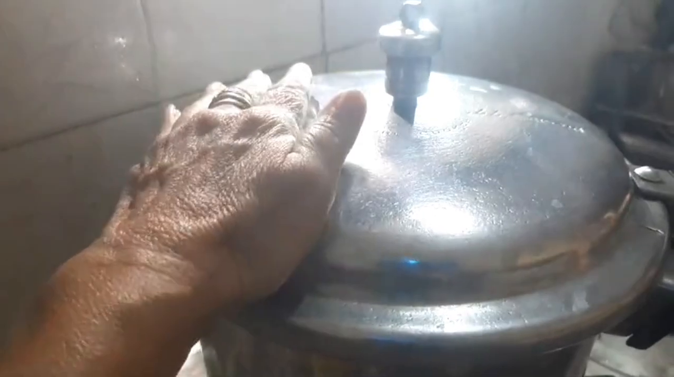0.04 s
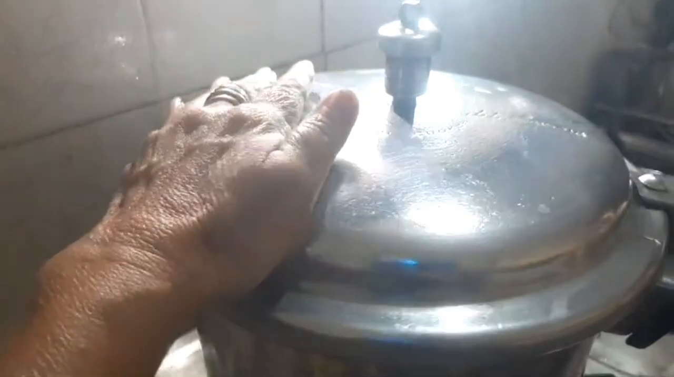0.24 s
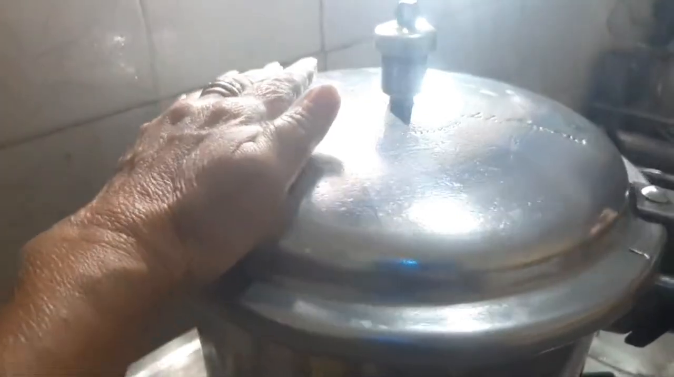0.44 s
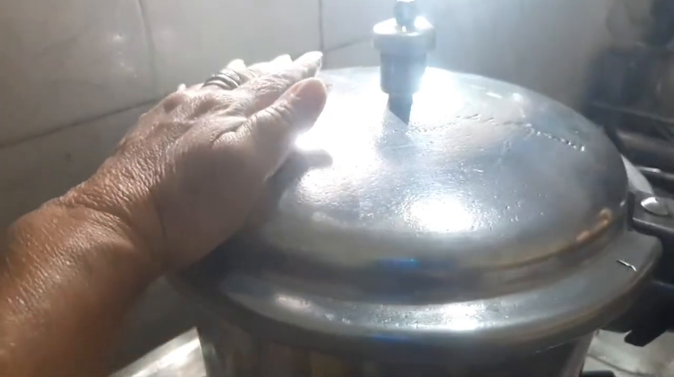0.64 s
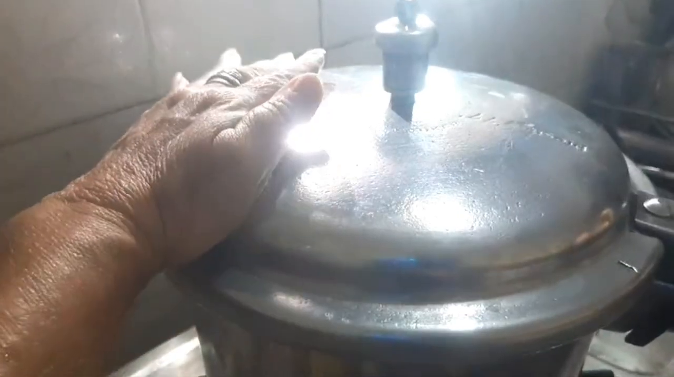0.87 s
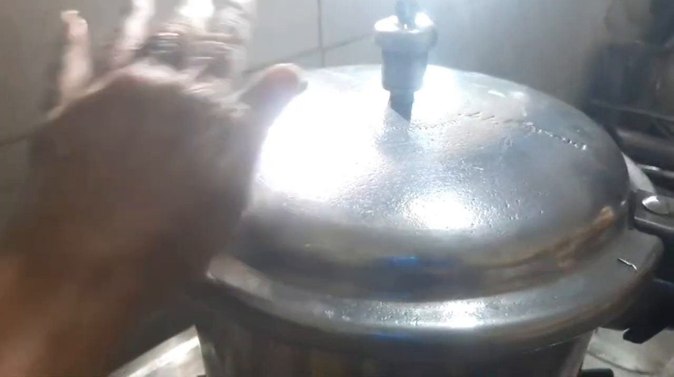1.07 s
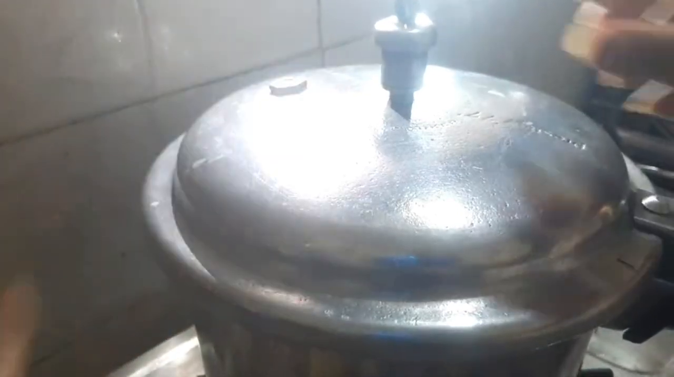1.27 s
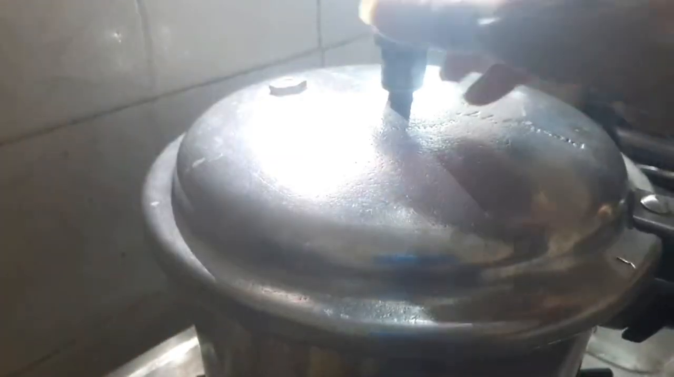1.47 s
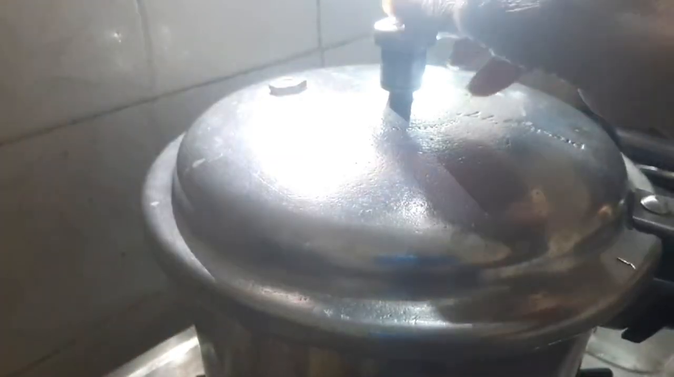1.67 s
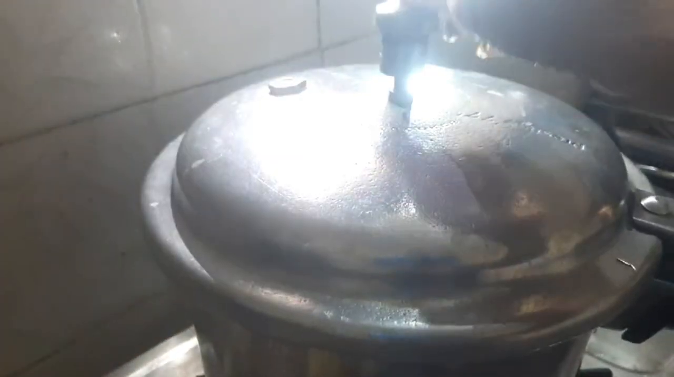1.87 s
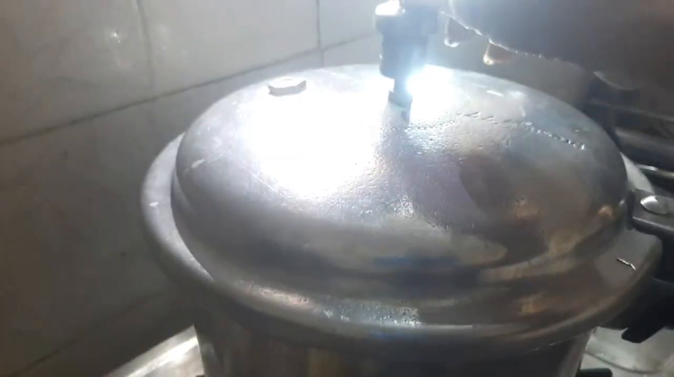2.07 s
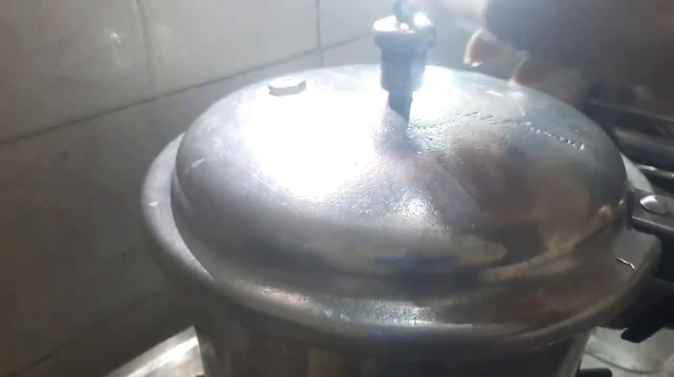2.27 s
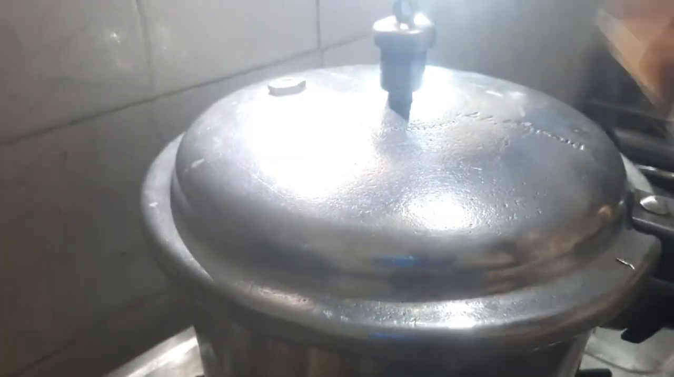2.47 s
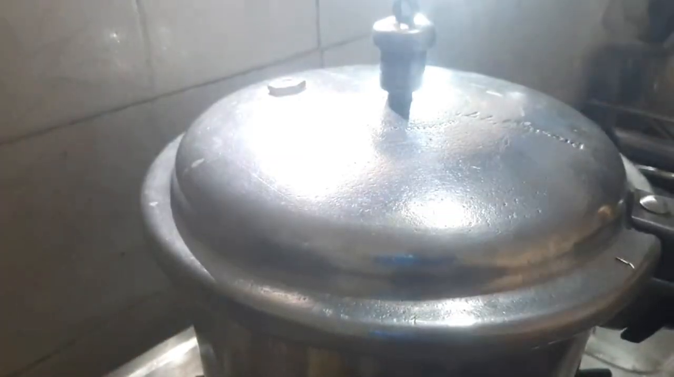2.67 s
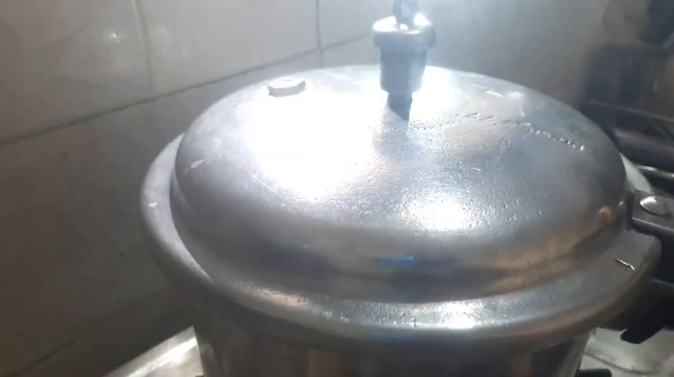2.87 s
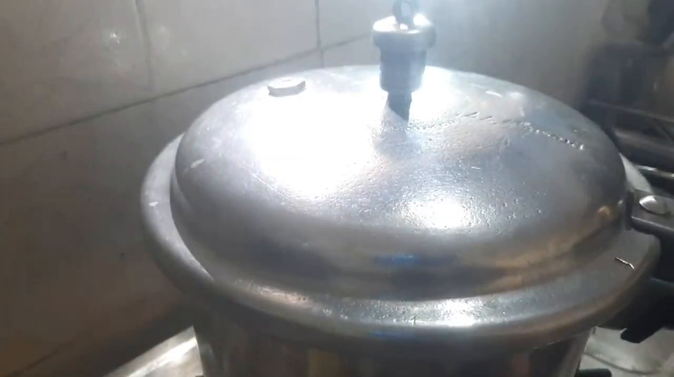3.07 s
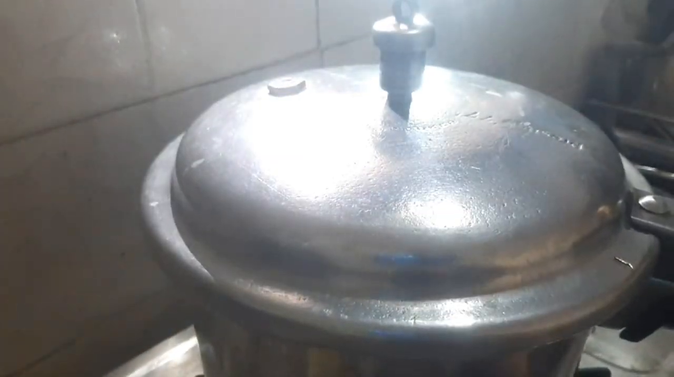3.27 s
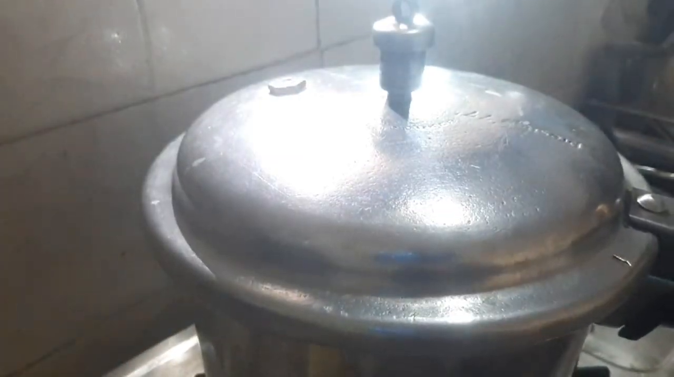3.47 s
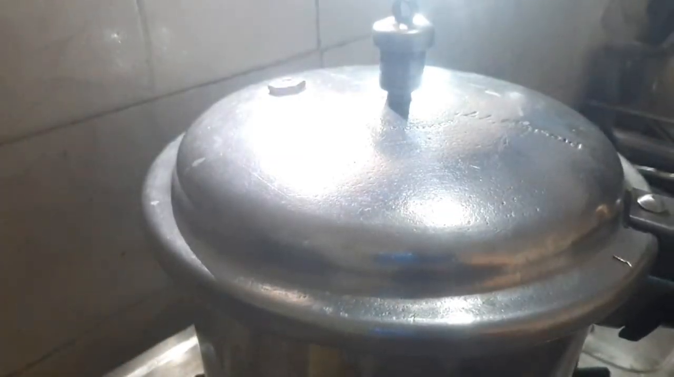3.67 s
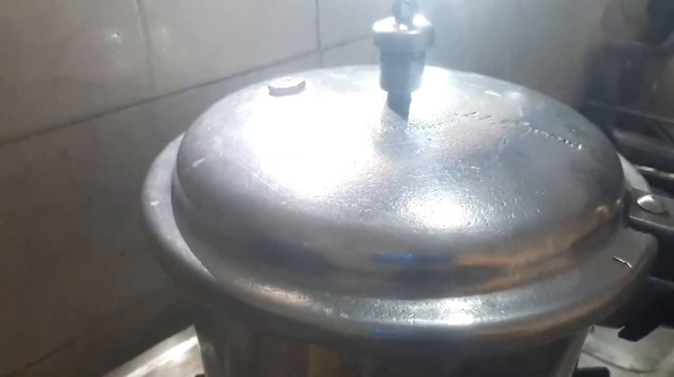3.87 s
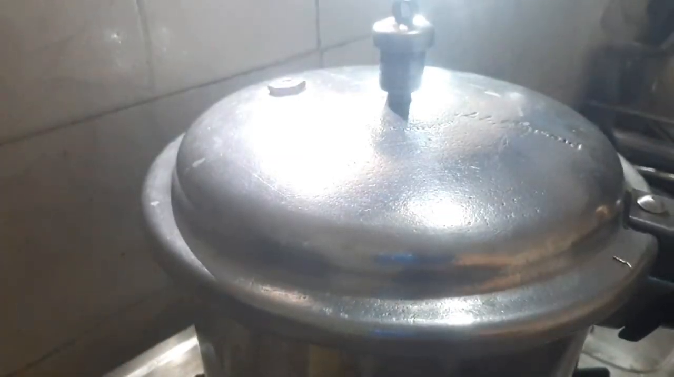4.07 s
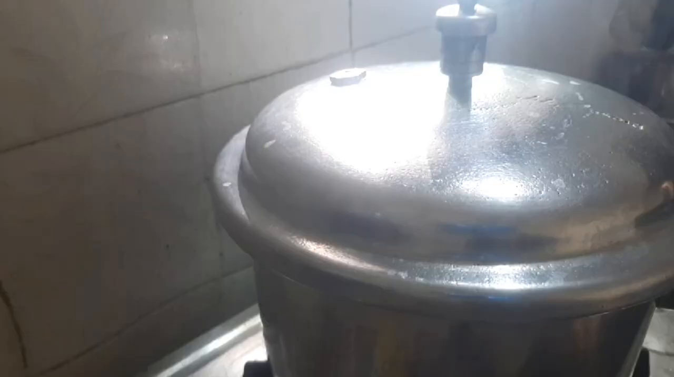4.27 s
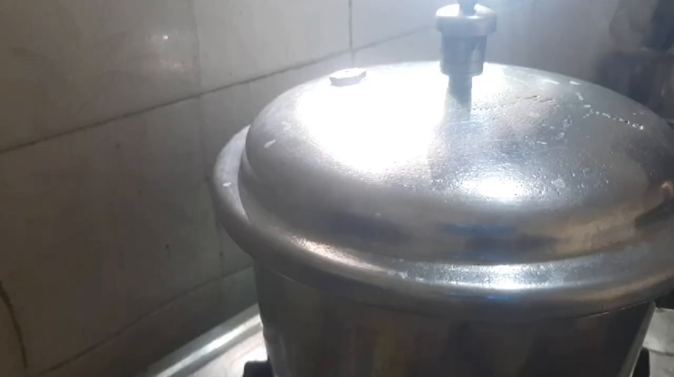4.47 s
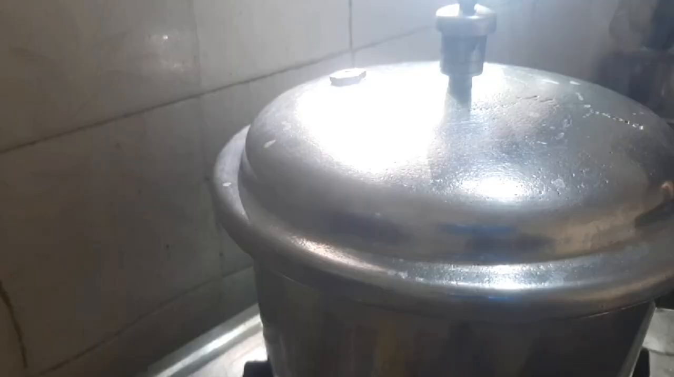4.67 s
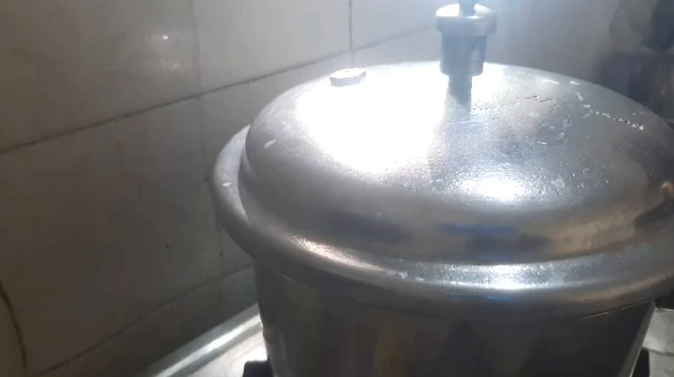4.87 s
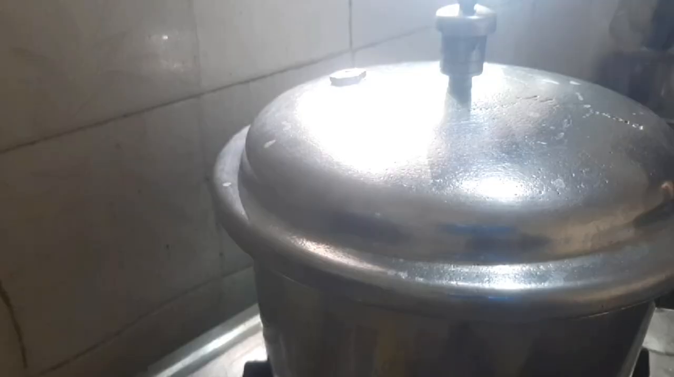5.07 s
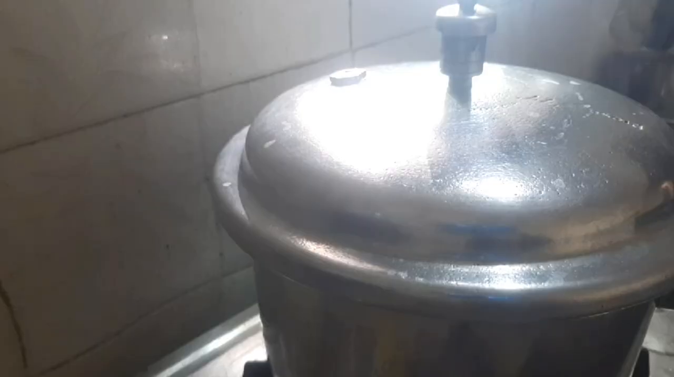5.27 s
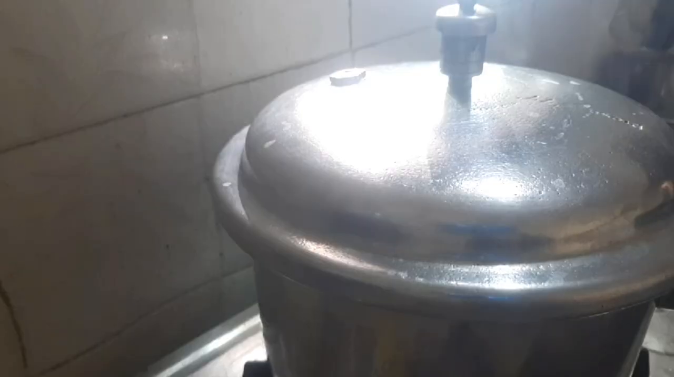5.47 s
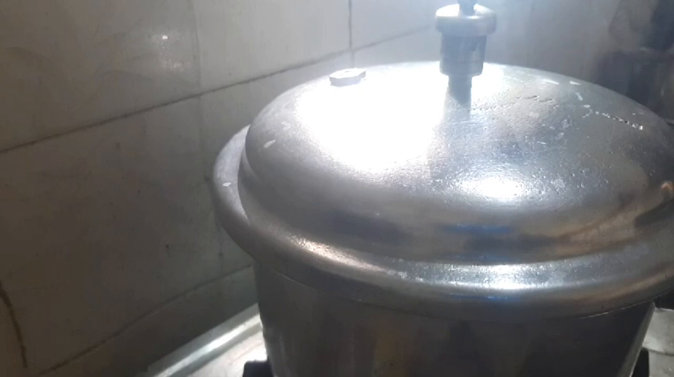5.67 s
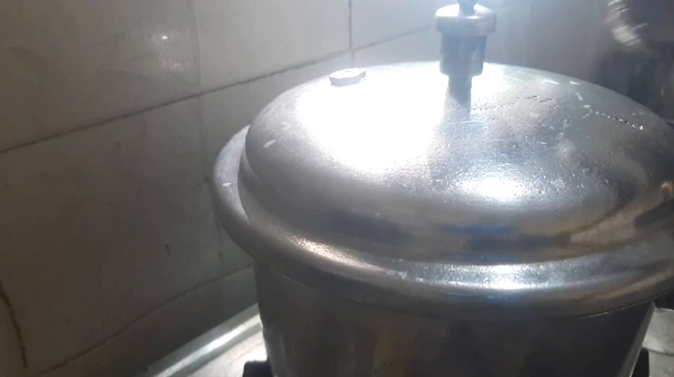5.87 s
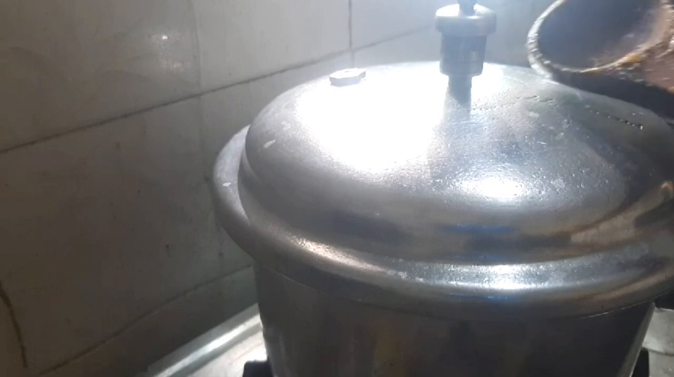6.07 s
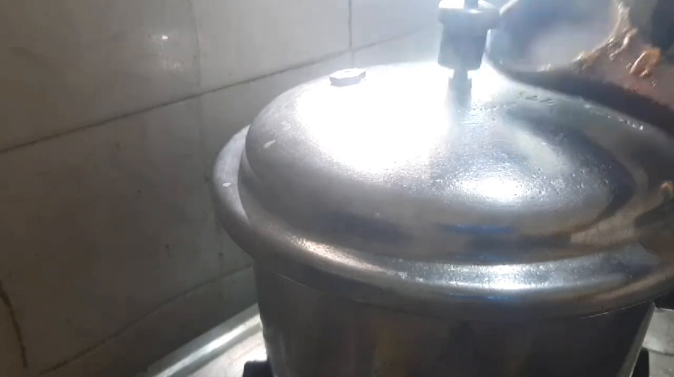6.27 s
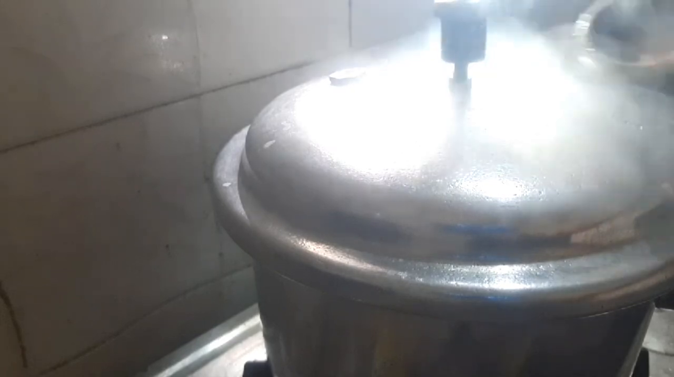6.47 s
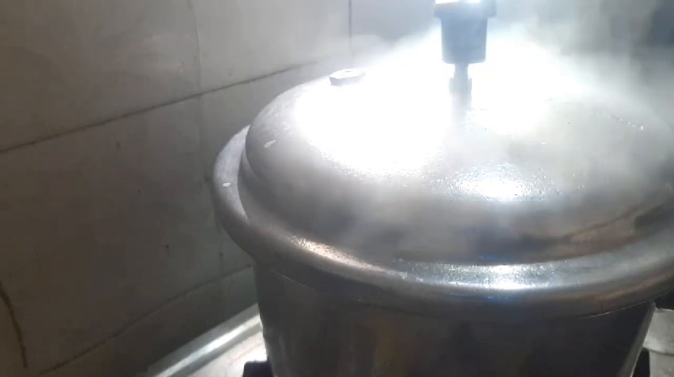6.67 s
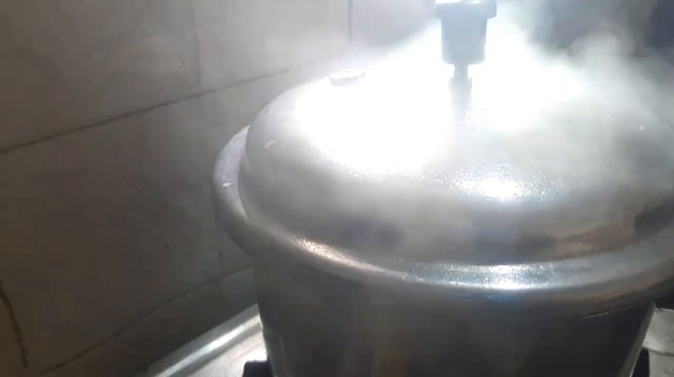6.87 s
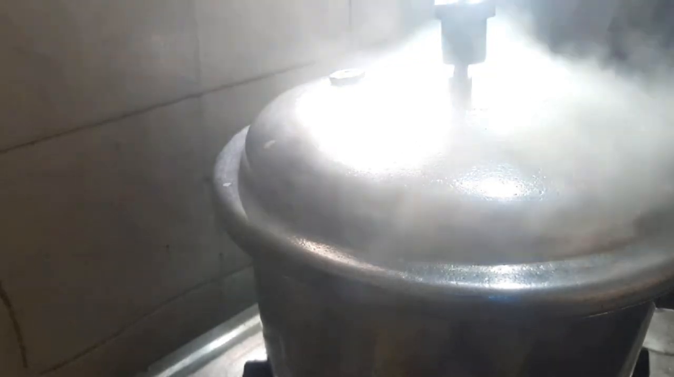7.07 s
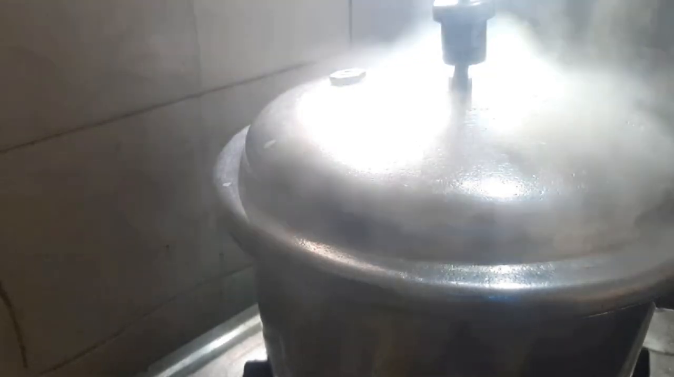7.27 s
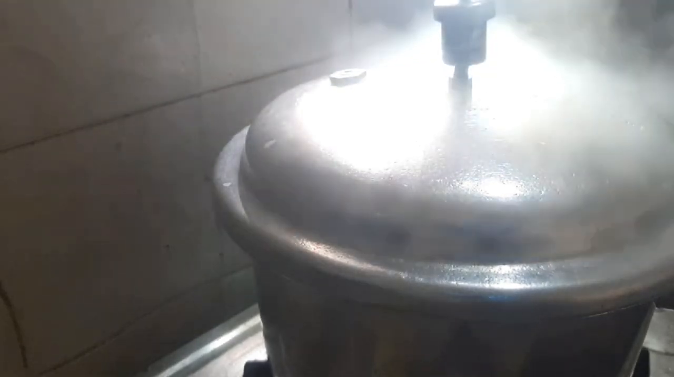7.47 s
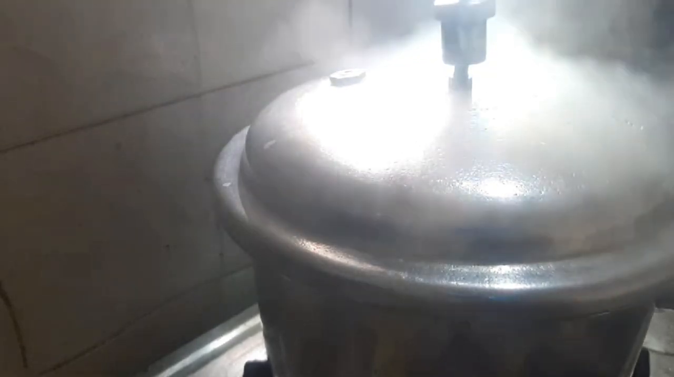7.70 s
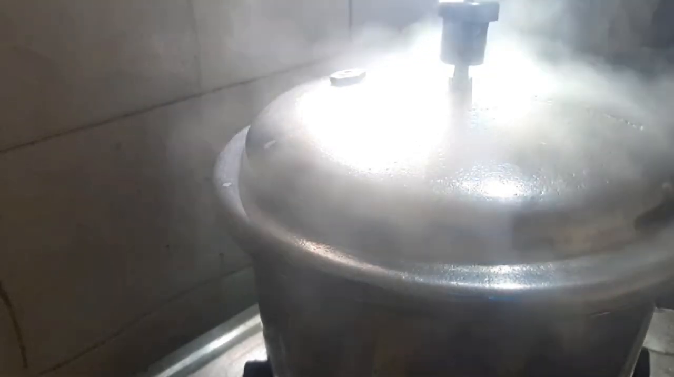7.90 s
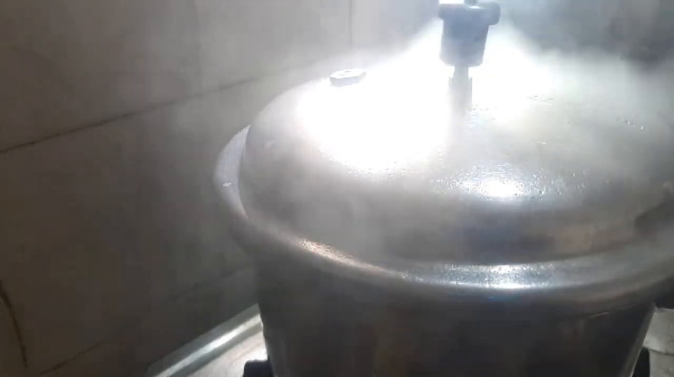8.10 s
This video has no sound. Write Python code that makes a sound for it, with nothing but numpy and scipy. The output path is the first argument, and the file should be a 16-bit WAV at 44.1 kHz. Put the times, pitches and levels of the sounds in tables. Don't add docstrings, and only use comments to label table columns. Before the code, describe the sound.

Light finger taps and metal clinks on a pressure cooker lid, then thin steam hiss, a ladle knock, and a loud full steam blast.

```python
import sys
import numpy as np
from scipy import signal
from scipy.fft import rfft, irfft, next_fast_len
from scipy.io import wavfile
from scipy.ndimage import uniform_filter1d

SR = 44100
rng = np.random.default_rng(int(sys.argv[2]) if len(sys.argv) > 2 else 0)


def makeup_ratio(level_db):
    decades = np.asarray(level_db, float) / 20
    return 10 ** decades


def transcribe(u):
    v = np.clip(np.atleast_2d(u).T, -1, 1)
    q = np.round(v * 32767).astype(np.int16)
    wavfile.write(sys.argv[1], SR, q)


N = 358974
FAST = next_fast_len(N, True)
FREQS = np.fft.rfftfreq(FAST, 1 / SR) + 1
CUT_S, LIFT_S = 4.1225, 6.222

# pitch_hz, level_db per Hz
WEIGHT_CRACK = [(100, -41), (200, -1), (900, -24), (1800, 3.5), (2800, -3.5), (3700, -10), (4500, 0),
                (6500, -19), (8300, -54), (10500, -17.5), (11800, -32), (12500, -77)]
# (pitch_hz, left_lag_rad)
BACK_STEREO = [
    [(60, 10), (200, 9.4), (380, 12), (700, 12), (4400, 8.2), (8120, 1.4), (15000, 7.8)],
    [(60, 0.81), (130, 1), (290, 0.97), (640, 0.38), (1410, 0.11), (3100, 0.03), (6820, 0.05), (15000, 0.6)],
    [(100, 0.12), (3000, 0.55)],
]


def rms_one(x):
    return x / np.sqrt(np.mean(x ** 2) + 1e-20)


def wave(spectrum):
    return irfft(spectrum, FAST)[..., :N]


def in_time(rows):
    s, *columns = np.transpose(rows)
    return np.array([np.interp(np.arange(N) / SR, s, c) for c in columns])


def at_hz(points, hz):
    points = np.array(points)
    return np.interp(np.log(hz), np.log(points[:, 0] + 1e-9), points[:, 1])


def swells(rows):
    t = np.arange(N) / SR
    power = 0
    for s, db, rise, fall in rows:
        away = np.maximum((s - t) / abs(rise), (t - s) / abs(fall))
        power = power + makeup_ratio(2 * (db - 10 * away))
    return np.sqrt(power)


def drift(rate):
    r = np.exp(-80 * np.pi * rate / SR)
    slow = signal.lfilter([1], [1, -2 * r, r * r], rng.standard_normal(N // 40 + 2002))[2000:]
    return np.interp(np.arange(N) / 40, np.arange(len(slow)), rms_one(slow))


def causal(points, share=1):
    curve_db = share * at_hz(points, np.linspace(1, SR / 2, 2049))
    cepstrum = irfft(np.log(makeup_ratio(curve_db)))
    cepstrum[1:2048] *= 2
    cepstrum[2049:] = 0
    return irfft(np.exp(rfft(cepstrum)))


def stereo_noise(spectrum, stereo, ripple_db=0.0):
    balance, likeness, lag = stereo
    mid, side = rfft(rng.standard_normal((2, N)), FAST)
    alike = np.sqrt(np.clip(at_hz(likeness, FREQS), 0, 1))
    pan = makeup_ratio(at_hz(balance, FREQS) / 2)
    pair = np.sqrt(1 + alike) * mid + np.sqrt(1 - alike) * side * [[1], [-1]]
    left_turn = pan * np.exp(-1j * at_hz(lag, FREQS))
    pair *= makeup_ratio(at_hz(spectrum, FREQS)) * np.array([left_turn, 1 / pan])
    ripple = rng.standard_normal((2, 300))
    comb = np.array([np.interp(FREQS, np.arange(300) * 75, r) for r in ripple])
    pair *= makeup_ratio(ripple_db * np.clip(FREQS / 4000, 0, 1) * comb)
    return pair / np.std(wave(pair.mean(axis=0)))


def resonance(hz, width_hz):
    noise = rfft(rng.standard_normal(N), FAST)
    return rms_one(wave(noise / (1 + 2j * (FREQS - hz) / width_hz) ** 2))


def steam(flow, law, spectrum, stereo, patchy_db, gust_db):
    # pitch_hz, width_hz, depth_db
    dips_and_lifts = [(2784, 130, -8.5), (3310, 120, 0), (4570, 110, 0), (5750, 300, -2.5), (8400, 740, -3.5),
                      (2025, 63, 2), (5350, 130, 3), (1500, 99, 2.5)]
    # pitch_hz, width_hz, level_db re the flow
    whistles = [(1830, 97, -54.5), (2026, 51, -26)]
    noise = stereo_noise(spectrum, stereo, ripple_db=1.8)
    dip_lift_db = sum(db * np.exp(-(2 * (FREQS - hz) / width) ** 2) for hz, width, db in dips_and_lifts)
    noise = noise * makeup_ratio(dip_lift_db)
    level_db, shares, opening_db, settle_s = law
    surge = np.exp(-np.maximum(np.arange(N) / SR - flow[0][0], 0) / settle_s)
    change = np.outer(shares, in_time(flow)[0]) + np.outer(opening_db, surge)
    centres = np.geomspace(300, 14000, 10)
    gust = gust_db * drift(25)
    out = 0
    for k, hz in enumerate(centres):
        band = np.interp(np.log(FREQS), np.log(centres), np.arange(10) == k)
        follow = [np.interp(np.log(hz), np.log([1600, 5000, 12000]), part) for part in np.eye(3)]
        out = out + wave(noise * band) * makeup_ratio(follow @ change + gust + patchy_db * drift(16))
    whistle = sum(makeup_ratio(db) * resonance(hz, width) for hz, width, db in whistles)
    return makeup_ratio(level_db) * (out + whistle * makeup_ratio(change[0]) * makeup_ratio([[2.5], [-2.5]]))


def steam_leak():
    # start_s, level_db
    leak_flow = [
        (4.13, 1),
        (4.5, 1),
        (6.22, -1.5),
    ]
    # level_db, flow shares of roar/hiss/sizzle, opening_db of roar/hiss/sizzle, settle_s
    leak_law = (-33.5, (.3, 0.51, 1.0), (0.78, -2.4, 0.34), 0.092)
    # pitch_hz, level_db per Hz
    leak_colour = [(120, -23), (300, -21.5), (900, -14.5), (1950, -3.5), (2750, -9), (4000, -6.5),
                   (6500, -7.5), (7300, -8), (8350, -21.5), (9500, -11), (11400, 0.5), (13200, -5.5),
                   (15750, -8)]
    # (pitch_hz, left_lag_rad)
    leak_stereo = [
        [(100, 14), (700, 9), (2000, 5), (2700, 3.5), (3600, 9), (4800, 0), (7300, -5.5), (12500, -0.5), (14000, 9), (15700, 3)],
        [(100, 0.55), (1000, 0.14), (1800, 0.33), (2700, .1), (5500, 0.089), (6500, 0.18), (8500, 0.058), (12000, 0.28), (14500, 0.018)],
        [(1500, 0.35), (2500, 1.2), (4500, 1.3), (5600, 0.67), (8500, -1), (10000, -1.03), (12500, 0.27), (14000, 0)],
    ]
    opened = np.clip((np.arange(N) / SR - CUT_S) / 0.0018, 0, 1)
    return opened * steam(leak_flow, leak_law, leak_colour, leak_stereo, patchy_db=0.6, gust_db=0.48)


def steam_jet():
    # start_s, level_db
    jet_flow = [(6.222, -20), (6.241, -5), (6.273, 4), (6.353, 4), (6.385, -0.5), (6.461, 7.5),
                (6.531, 2.5), (6.56, 6.5), (6.63, 3.5), (6.7, 4), (6.74, 0), (6.975, -1), (7.04, 1.5),
                (7.2, 0), (7.33, 2), (7.46, 0), (7.8, 2), (8.1, -1.5)]
    # level_db, flow shares of roar/hiss/sizzle, opening_db of roar/hiss/sizzle, settle_s
    jet_law = (-23.5, (0.34, 0.083, 1), (9.3, 1.6, 0.55), 0.35)
    # pitch_hz, level_db per Hz
    jet_colour = [(35, -40.5), (90, -27.5), (330, -25), (900, -19), (1500, -11), (2050, -8.5), (2720, -10),
                  (3800, -7), (6300, -5), (8350, -18), (9700, -7.5), (11500, 1), (13500, -5.5), (15750, -9)]
    # (pitch_hz, left_lag_rad)
    jet_stereo = [
        [(100, -5), (350, -2.5), (1500, 5.5), (2600, 0), (3300, 8.5), (4500, 3), (5400, -1.5), (9000, -3.5), (12500, 1.5), (14000, 4.5), (15700, 9)],
        [(100, 0.13), (1000, .12), (1800, 0.19), (2700, 0.057), (5500, 0.039), (6400, 0.1), (7600, 0.062), (10500, 0.23), (13000, .05), (15000, .01)],
        [(1500, 0), (2500, 0.8), (4500, 1.66), (5500, 6), (6000, 0.74), (9000, -0.1), (11000, 0.58), (14000, 1)],
    ]
    return steam(jet_flow, jet_law, jet_colour, jet_stereo, patchy_db=0.92, gust_db=0.4)


def strike(blows, modes, crack, ring_db, crack_db, damping, top_hz):
    s, peak_db, tilt, contact_ms = np.transpose(blows)
    start = int(s[0] * SR)
    luck = rng.normal(0, 0.77, (len(s), len(modes)))
    at = (s * SR).astype(int) - start
    out = 1e-9 * rng.standard_normal(at[-1] + SR)
    age = np.arange(2048) / SR / np.clip(contact_ms[:, None] / 1000, 2e-4, .02)
    bursts = rng.standard_normal((len(s), 2048)) * np.exp(-age)
    tint = uniform_filter1d(np.abs(rfft(bursts)) ** 2, size=15, axis=1)
    pitch = np.arange(1025) * SR / 2048 + 1
    evened = []
    for burst, power in zip(bursts, tint):
        flatten = causal(np.c_[pitch, -6 * np.log10(power / power.mean())])
        evened.append(signal.fftconvolve(burst, flatten)[:2048])
    bursts = np.array(evened) * (1 - .85 * np.exp(-age / .25))
    drive = np.abs(rfft(bursts))
    for k, (hz, level_db, t60) in enumerate(modes):
        push = np.zeros(len(out)) + 1e-18
        tilt_db = tilt * np.log2(max(hz, 300) / 1000)
        strength = makeup_ratio(peak_db + level_db + ring_db + tilt_db + luck[:, k])
        strength /= drive[:, round(hz / SR * 2048)] + .3 * drive.mean(axis=1)
        for i, g, burst in zip(at, strength, bursts):
            push[i:i + 2048] += g * burst
        r = makeup_ratio(-60 / (min(t60, 1) * damping * SR))
        w = 2 * np.pi * hz / SR
        out += signal.lfilter([0, np.sin(w)], [1, -2 * r * np.cos(w), r * r], push)
    colour = causal(crack)
    for i, level_db, slope, burst in zip(at, peak_db, tilt, bursts):
        burst = signal.fftconvolve(burst, colour)
        tilted = causal([(250, -2 * slope), (16000, 4 * slope)])
        burst = signal.fftconvolve(burst, tilted)[:4096]
        out[i:i + 4096] += makeup_ratio(level_db + crack_db) * burst / np.abs(burst).max()
    out = signal.sosfilt(signal.cheby1(8, 1, top_hz, fs=SR, output="sos"), out)
    out = signal.sosfilt(signal.butter(2, 75, "high", fs=SR, output="sos"), out)
    return np.pad(out, (start, N - start - len(out)))


def ringing(blows, modes, rise_s, t60):
    out = 0
    for s, db in blows:
        age = np.maximum(np.arange(N) / SR - s, 0)
        shape = makeup_ratio(db - 60 * age / t60) * (1 - np.exp(-age / rise_s))
        out = out + shape * sum(makeup_ratio(level_db) * np.sin(2 * np.pi * hz * age) for hz, level_db in modes)
    return out


def lid_taps():
    # start_s, peak_db, tilt_db per octave, contact_ms
    taps = [
        (0.025, -43, 8.5, 3.1),
        (0.292, -32, -0.5, 4.4),
        (0.366, -29.5, -1, 4.2),
        (0.493, -31.5, 1.5, 3.4),
        (0.554, -46, 2, 3.9),
        (0.704, -43, -7.5, 6.9),
        (0.739, -54, -7, 5),
    ]
    # pitch_hz, level_db, t60_s
    lid = [(383.6, -2.5, 0.98), (595, 8, 0.09), (730, -6, 0.292), (860, -11, 0.26), (936, 4, 0.175),
           (1470, -9, 0.215), (2040, -19, 0.39), (3420, -19, 0.17), (4350, -24, .15), (5260, -14.5, 0.065)]
    # pitch_hz, level_db per Hz
    lid_crack = [(100, -10), (250, -12), (700, 3), (1200, 2.5), (2100, -3), (3000, -18.5), (5300, -17),
                 (7000, -54)]
    return strike(taps, lid, lid_crack, ring_db=-12, crack_db=-1.5, damping=0.2, top_hz=6000)


def stem_knocks():
    # start_s, peak_db, tilt_db per octave, contact_ms
    touches = [
        (1.498, -31.5, -0.7, 3.5),
        (1.619, -40, 1.3, 1.5),
        (1.7365, -29, 0.22, 2.2),
        (1.751, -39.5, 0.7, 0.72),
        (1.774, -39.5, 0.37, 2),
    ]
    # start_s, peak_db, tilt_db per octave, contact_ms
    drop = [
        (1.908, -27.5, 0.7, 3.9),
        (1.9133, -13, 0.99, 1.14),
        (1.922, -20, 0.9, 1.6),
        (1.927, -33, 0.7, 1.2),
        (1.944, -38, 0.64, 1.5),
    ]
    # pitch_hz, level_db, t60_s
    stem = [(383, -12.5, .06), (944, -6, 0.036), (1540, -19.5, 0.03), (1796, -2.5, 0.039),
            (1904, -6.5, 0.04), (2063, -10.5, 0.039), (2830, -9, .03), (3155, -1.5, 0.021),
            (4140, -19, 0.022), (5300, -21.5, 0.027)]
    # pitch_hz, level_db per Hz
    stem_crack = [(100, -14.5), (200, 5), (900, -11.5), (1800, -0.5), (2450, 2.5), (3200, -7), (5400, -7.5),
                  (7000, -50.5), (12000, -51.5)]
    # pitch_hz, level_db
    stem_ping = [(1815, 0.0)]
    # start_s, level_db
    stem_blows = [
        (1.912, -37),
    ]
    out = strike(touches, stem, stem_crack, ring_db=-8, crack_db=-7.0, damping=0.49, top_hz=5470)
    out += strike(drop, stem, stem_crack, ring_db=-4.0, crack_db=-10, damping=1.0, top_hz=5830)
    return out + ringing(stem_blows, stem_ping, rise_s=0.0032, t60=0.4)


def weight_seating():
    # start_s, peak_db, tilt_db per octave, contact_ms
    seating = [
        (2.1905, -17.5, -1, 4.6),
        (2.1995, -17, 2.5, 1.2),
        (2.2065, -14.5, 0, 3.9),
        (2.212, -23, -1.7, 3.3),
        (2.216, -24.5, 6.7, 1.9),
        (2.219, -23, 1.8, 0.59),
    ]
    # pitch_hz, level_db, t60_s
    weight = [(945, -7, 0.05), (1750, -9.5, 0.037), (1855, 3.5, 0.032), (2804, -15, 0.05),
              (3210, -15, 0.053), (4435, -11, 0.08), (4870, -16, 0.055), (4970, -15.5, 0.053),
              (5300, -26, 0.064)]
    # pitch_hz, level_db
    ping = [(2870, 3), (2770, -4.5), (2745, -5), (4540, -2), (4490, -7.5), (4590, -14), (4996, -8.5),
            (1846, -5), (1760, -16.5), (3456, -11)]
    # start_s, level_db
    ping_blows = [
        (2.207, -39),
        (2.219, -43),
    ]
    out = strike(seating, weight, WEIGHT_CRACK, ring_db=-8.5, crack_db=-2, damping=0.83, top_hz=12000)
    return out + ringing(ping_blows, ping, rise_s=.004, t60=0.35)


def weight_slides():
    # start_s, level_db, rise_s and fall_s per 10 dB
    slides = [
        (1.884, -33, 0.014, .012),
        (1.905, -38, .004, 0.0012),
        (2.16, -50, 0.13, .1),
        (2.186, -39.5, .007, .001),
    ]
    return swells(slides) * makeup_ratio(-9.0) * resonance(1820, 90)


def ladle():
    # start_s, peak_db, tilt_db per octave, contact_ms
    knocks = [
        (6.229, -22, 0.7, 2.2),
        (6.24, -7, 0.53, 1.8),
        (6.2455, -12, 0.82, 1.9),
        (6.256, -19, .7, 1.5),
        (6.266, -13.5, 0.77, 1.5),
        (6.282, -25.5, 0.7, 1.32),
    ]
    # pitch_hz, level_db, t60_s
    bowl = [(1152, -4, .06), (1480, 2.5, 0.043), (1770, 6.5, 0.049), (2510, -14, 0.026), (3120, -7, 0.056),
            (4020, -11, .04)]
    # start_s, level_db
    scrapes = [
        (7.31, -31.5),
        (7.385, -35.5),
        (7.45, -39.5),
        (7.491, -32.5),
        (7.73, -35.5),
    ]
    hits = strike(knocks, bowl, WEIGHT_CRACK, ring_db=-8.0, crack_db=-4.5, damping=0.47, top_hz=9000)
    slips = swells([(s, db, 0.036, 0.013) for s, db in scrapes]) * resonance(1700, 770)
    return signal.sosfilt(signal.butter(2, 800, "high", fs=SR, output="sos"), hits) + slips


def pan():
    # start_s, peak_db, tilt_db per octave, contact_ms
    set_down = [
        (2.89, -52.5, -1.5, 21),
        (2.946, -40, -5, 24),
        (3.003, -43, -6, 23),
        (3.025, -12.5, -0.4, 13.5),
        (3.056, -21, -1, 6),
    ]
    # start_s, peak_db, tilt_db per octave, contact_ms
    nudges = [
        (1.069, -56, -12, 27),
        (3.357, -44, -9.5, 17),
    ]
    # pitch_hz, level_db, t60_s
    pan_modes = [(218, -14, 0.41), (312, -13.5, 0.31), (393, 0.5, 0.45), (566, -20, 0.21),
                 (627.4, -2, 0.47), (690, -5, 0.29), (710, -7, 0.32), (794, -11, .25), (872, -8, 0.22),
                 (911, -10, 0.23), (1130, -23, 0.3), (1286, -20, 0.3), (1825, -13, 0.12)]
    # pitch_hz, level_db per Hz
    pan_crack = [(100, -26.5), (300, -2), (650, -8.5), (1100, -12), (2000, -26.5), (4800, -27), (7000, -47),
                 (8400, -48), (11100, -29), (15700, -37)]
    out = strike(set_down, pan_modes, pan_crack, ring_db=-7.5, crack_db=-6.0, damping=0.17, top_hz=16100)
    out += strike(nudges, pan_modes, pan_crack, ring_db=-14.0, crack_db=-9, damping=0.08, top_hz=482)
    return out


def stove_grate():
    # pitch_hz, level_db
    grate = [(122.3, 0), (83, -6), (114.2, -7.5), (135, -5)]
    # start_s, level_db
    grate_blows = [
        (0.293, -47),
        (0.367, -51),
        (0.494, -57),
        (1.912, -31),
        (2.2, -31.5),
    ]
    return ringing(grate_blows, grate, rise_s=0.032, t60=0.65)


def metal_ticks():
    # start_s, level_db, pitch_hz
    tick_rows = [
        (0.0265, -43, 5200),
        (1.4982, -49, 10500),
        (1.9252, -59, 8500),
    ]
    out = np.zeros(N)
    age = np.arange(400) / SR
    for s, db, hz in tick_rows:
        i = int(s * SR)
        out[i:i + 400] += makeup_ratio(db) * np.exp(-age / .0012) * np.sin(2 * np.pi * hz * age)
    return out


def kitchen(dry, wet_db, alike, gap_s):
    # pitch_hz, t60_s
    decay = [(100, 0.4), (400, 0.56), (1500, 0.32), (4000, 0.48), (8000, 0.3), (15000, 0.28)]
    # pitch_hz, left_minus_right_db
    near_balance = [(60, 1.5), (110, 6.5), (200, 9), (380, 7), (700, 8), (1290, 6), (2380, 11), (4400, 7),
                    (8120, -8.5), (15000, 12.5)]
    age = np.arange(SR) / SR
    shared, *own = rng.standard_normal((3, SR))
    noise = rfft(alike * shared + np.array(own))
    hz = np.arange(SR // 2 + 1) + 1
    centres = np.geomspace(100, 15000, 9)
    tail = 0
    for k, centre in enumerate(centres):
        band = np.interp(np.log(hz), np.log(centres), np.arange(9) == k)
        tail = tail + irfft(noise * band) * makeup_ratio(-60 * age / at_hz(decay, centre))
    tail *= makeup_ratio(wet_db) * (1 - np.exp(-age / gap_s))
    tail[:, 0] = 1
    ears = np.array([causal(near_balance, .5), causal(near_balance, -.5)])
    room = signal.fftconvolve(tail, ears, axes=1)
    return signal.fftconvolve(room, dry[None], axes=1)[:, :N]


def palm_rustle():
    # start_s, level_db, rise_s and fall_s per 10 dB
    palm = [
        (0.0, -69.5, .1, .2),
        (0.33, -69, .05, .15),
        (0.55, -70, 0.12, 0.07),
        (1.12, -82, .1, .1),
    ]
    band = signal.butter(4, [2300, 5900], "band", fs=SR, output="sos")
    skin = signal.sosfilt(band, rng.standard_normal((2, N)))
    return swells(palm) * rms_one(skin) * makeup_ratio([[3.5], [-3.5]])


def stirred_air():
    # start_s, level_db, rise_s and fall_s per 10 dB
    sweeps = [
        (5.8, -61, 0.42, 0.54),
        (6.24, -42, 0.055, 0.081),
    ]
    # start_s, level_db, rise_s and fall_s per 10 dB, pitch_hz
    far_tones = [
        (1.0, -82, 0.13, .1, 2230),
        (1.25, -74, .15, .15, 1500),
    ]
    band = signal.butter(2, [230, 620], "band", fs=SR, output="sos")
    air = signal.sosfilt(band, rng.standard_normal((2, N)))
    tones = sum(swells([row[:4]]) * resonance(row[4], 70.0) for row in far_tones)
    return swells(sweeps) * rms_one(air) + tones * makeup_ratio([[3], [-3]])


def clock():
    # first_s, period_s, pitch_hz, level_db
    ticking = (.075, .32, 12200, -66)
    first, period, hz, level_db = ticking
    age = (np.arange(N) / SR - first) % period
    return makeup_ratio(level_db) * resonance(hz, 1480) * np.exp(-age / .008)


def stove_shudder():
    # start_s, level_db
    shudders = [
        (0.0, -57.5),
        (0.3, -53),
        (0.48, -57),
        (1.95, -47.5),
        (2.221, -46.5),
        (3.1, -44.5),
    ]
    return swells([(s, db, 0.041, 0.15) for s, db in shudders])


def flame(shudder):
    # pitch_hz, level_db per Hz
    rumble = [(12, -55.5), (20, -28), (54, -10.5), (86, -3), (103, 1), (121, 0.5), (173, -25), (200, -29.5),
              (260, -58.5), (440, -120)]
    # start_s, level_db, rise_s and fall_s per 10 dB
    flares = [
        (4.17, -55, 0.082, -0.7),
        (5.69, -48, 0.62, 0.25),
        (6.3, -49.5, 0.27, 0.25),
    ]
    t = np.arange(N) / SR
    steady = makeup_ratio(np.select([t < CUT_S, t < LIFT_S], [-60, -54.5], -64))
    level = np.hypot(steady, np.hypot(swells(flares), makeup_ratio(-6) * shudder))
    return level * makeup_ratio(2.5 + 2.0 * drift(2.4)) * wave(stereo_noise(rumble, BACK_STEREO))


def far_street(shudder):
    # pitch_hz, level_db per Hz
    street_colour = [(100, -44), (170, 2.5), (234, -10), (277, 1.5), (328, -9.5), (444, -9), (499, -8.5),
                     (1540, -17.5), (9500, -43), (12400, -88)]
    # pitch_hz, level_db per Hz
    hum_colour = [(530, -44.5), (1000, -26), (1110, -6.5), (1280, -4.5), (1530, -2), (2330, -15),
                  (2620, -31), (3000, -32.5), (3900, -53), (6600, -120)]
    # start_s, level_db, rise_s and fall_s per 10 dB
    passes = [
        (1.2, -72.5, .15, -2.2),
        (3.85, -62, 1, 1),
    ]
    street = np.hypot(makeup_ratio(-66), shudder) * makeup_ratio(-3.0 + 1.2 * drift(1.4))
    street = street * wave(stereo_noise(street_colour, BACK_STEREO))
    level = np.hypot(makeup_ratio(-78), np.hypot(swells(passes), makeup_ratio(-4.5) * shudder))
    hum = level * makeup_ratio(-7.0 + 1.2 * drift(6.9)) * wave(stereo_noise(hum_colour, BACK_STEREO))
    hum = hum + swells(passes) * makeup_ratio(-11.5) * resonance(1600, 60) * makeup_ratio([[3], [-3]])
    return (street + hum) * (np.arange(N) / SR < CUT_S)


def far_squeak():
    # start_s, level_db, rise_s and fall_s per 10 dB
    chirp_low = [
        (3.65, -78, .03, 0.19),
        (3.8, -74, 0.14, .025),
    ]
    # start_s, level_db, rise_s and fall_s per 10 dB
    chirp_high = [
        (3.74, -78, 0.089, 0.18),
    ]
    chirps = swells(chirp_low) * resonance(3494, 70) + swells(chirp_high) * resonance(3900, 200)
    return chirps * makeup_ratio([[2.5], [-2.5]])


def scene():
    blows = lid_taps() + stem_knocks() + weight_seating() + weight_slides() + ladle()
    blows += pan() + stove_grate() + metal_ticks()
    lifted = np.clip((np.arange(N) / SR - LIFT_S) / 0.0085, 0, 1)
    valve = steam_leak() * (1 - lifted) + steam_jet() * lifted
    handling = kitchen(blows, wet_db=-35.0, alike=0.67, gap_s=0.0011) + palm_rustle() + stirred_air()
    shudder = stove_shudder()
    return valve + handling + clock() + flame(shudder) + far_street(shudder) + far_squeak()


def band_limit(x):
    return signal.sosfilt(signal.butter(12, 15760, fs=SR, output="sos"), x)


def record(dry):
    # pitch_hz, level_db per Hz
    self_noise = [(9700, -42), (10100, -7.5), (12000, 1), (13500, -6), (15800, -5)]
    hiss = makeup_ratio(-74) * wave(stereo_noise(self_noise, BACK_STEREO))
    whine_level = makeup_ratio(-56 - np.array([[0], [17]])) * np.sqrt(2)
    whine = whine_level * np.sin(2 * np.pi * 11486 * np.arange(N) / SR)
    mix = 0.9 * np.tanh(dry / 0.92) + hiss + whine
    return band_limit(mix)


dry = scene()
out = record(dry)
transcribe(out)
```